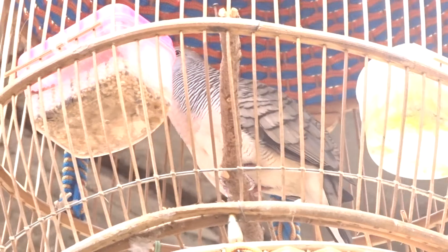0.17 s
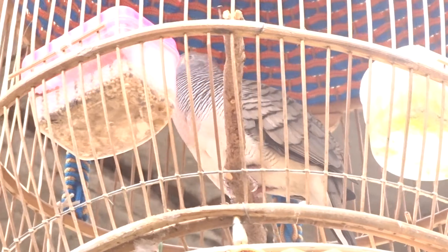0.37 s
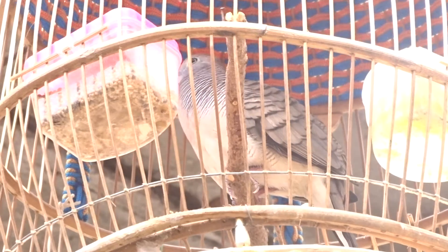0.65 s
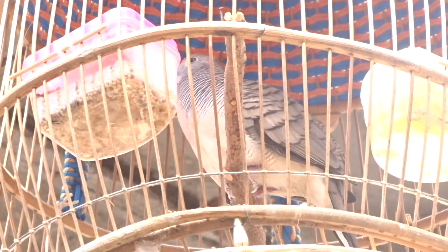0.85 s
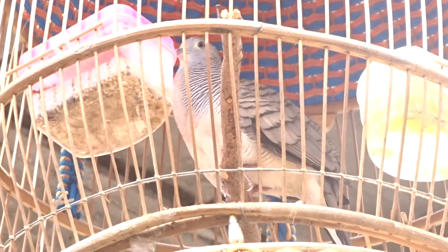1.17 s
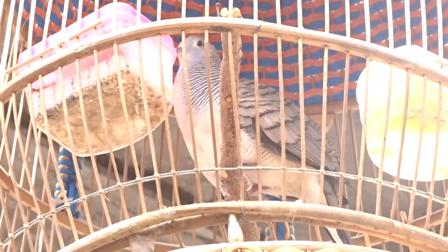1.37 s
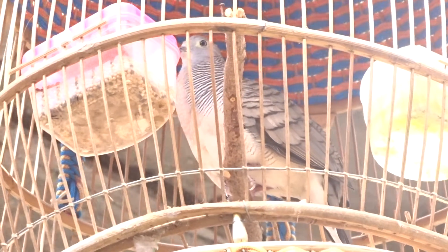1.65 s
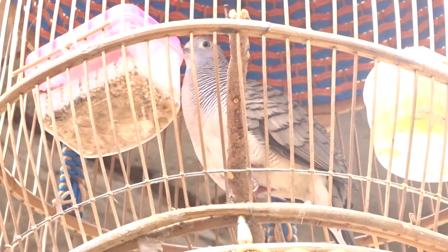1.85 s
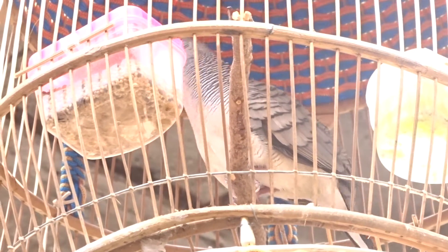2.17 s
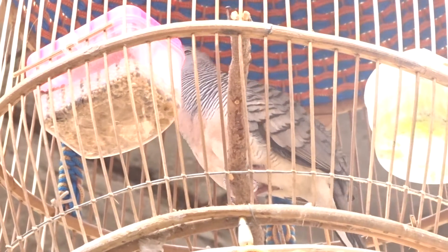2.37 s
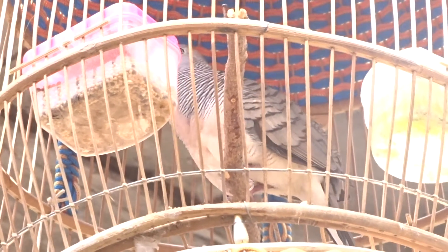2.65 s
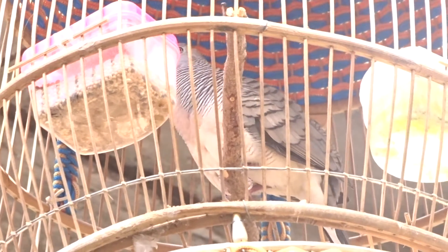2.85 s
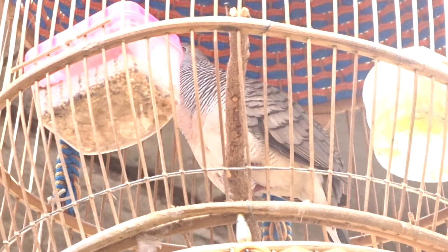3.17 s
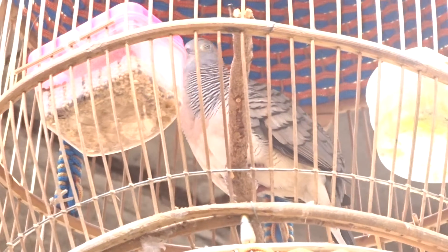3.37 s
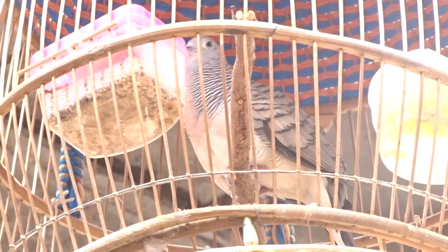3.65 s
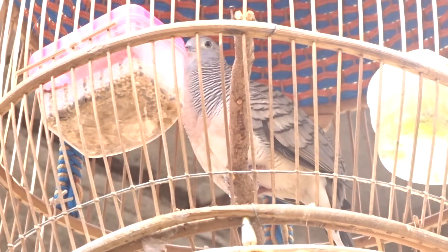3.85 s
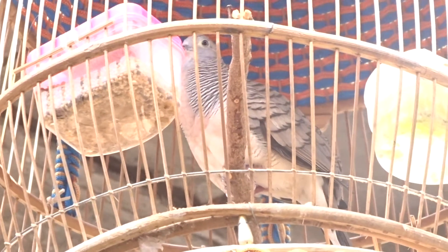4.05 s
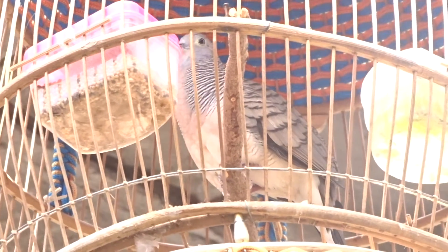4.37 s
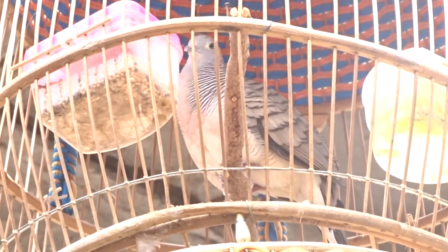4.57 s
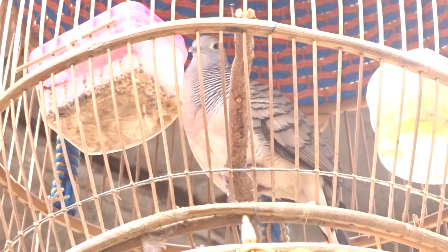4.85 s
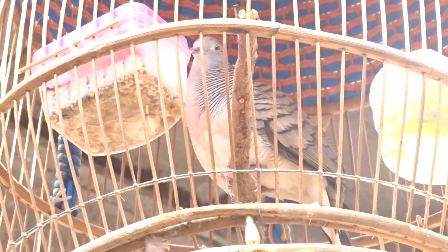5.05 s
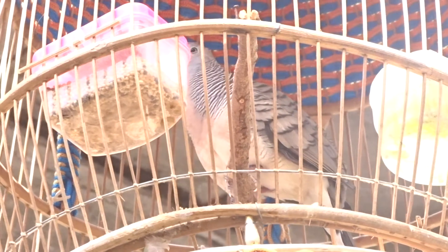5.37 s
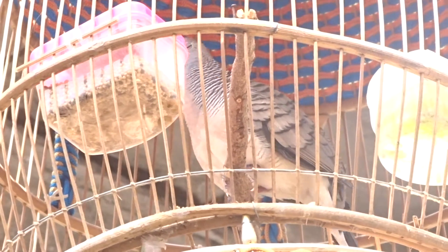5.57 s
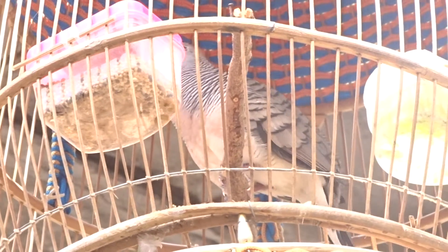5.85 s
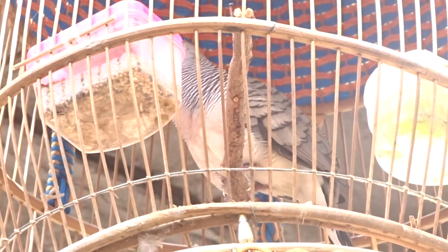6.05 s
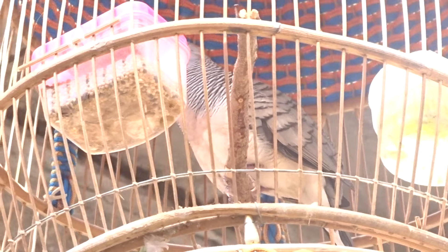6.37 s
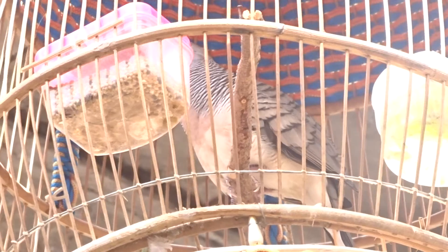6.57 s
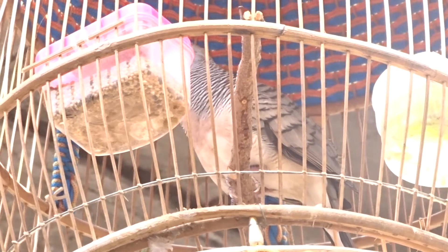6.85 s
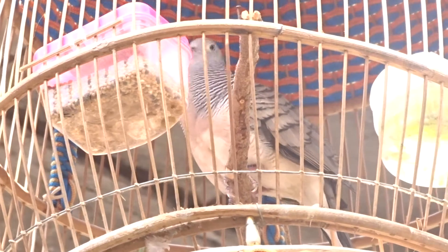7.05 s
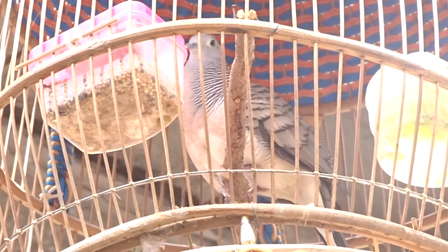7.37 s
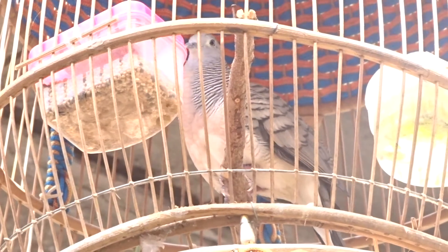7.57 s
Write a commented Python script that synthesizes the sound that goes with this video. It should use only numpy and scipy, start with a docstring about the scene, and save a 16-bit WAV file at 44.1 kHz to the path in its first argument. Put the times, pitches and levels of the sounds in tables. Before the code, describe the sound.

Near-pure, hollow coos scoop upward and sag in rapid strings of very short notes, at the start, after two seconds and near six. Other doves reply more faintly. Between them come brief falling, raspy sparrow chirps, a breathy swish before four seconds and a sharp tick near the end. Short porch echoes surround everything over a faint distant street hush; the stereo pickup is fairly close.

```python
"""Zebra doves under a porch

Zebra doves coo in quick trilled phrases from cages under a reverberant porch: near-pure tones scoop up,
hold and sag, and after a pause a slower, steadier note opens the phrase. Sparrows chirp and whistle
among them as fluttering tones, often on two voices at once. Swishes, soft bumps and ticks are short
shaped noise; faint far hoots are plain wavering tones. Coloured noise and a hum make the outdoor hush."""
import sys
import numpy as np
from scipy import signal
from scipy.fft import rfft, irfft, next_fast_len
from scipy.io import wavfile
from scipy.ndimage import map_coordinates

SR = 44100
rng = np.random.default_rng(int(sys.argv[2]) if len(sys.argv) > 2 else 0)


def master_out(mix):
    """Clip the mix to full scale and print it as 16-bit PCM to the path in sys.argv[1]."""
    frames = np.transpose(np.atleast_2d(mix))
    ceiling = np.clip(frames, -1, 1)
    pcm = np.round(ceiling * 32767).astype(np.int16)
    wavfile.write(sys.argv[1], SR, pcm)


N = 339983  # samples

# far street noise and treble hiss together: pitch_hz, density_db (per Hz, relative)
HUSH_SPECTRUM = [(20, -46), (40, -13), (60, -11.5), (100, -9), (180, -3.5), (330, -4), (600, -3.5),
                 (1000, -4), (1600, -10), (3500, -8), (6000, -7.5), (8000, -2), (10000, -5), (11000, -11)]
# slow swell of the far street's rumble, before STREET_GAIN_DB: time_s, level_db
STREET_SWELL = [(0.0, -60), (3.63, -59), (3.71, -58), (5.78, -64), (6.4, -57), (6.91, -60.5), (7.17, -61),
                (7.71, -62.5)]
# slow swell of the treble hiss, before HISS_GAIN_DB: time_s, level_db
HISS_SWELL = [(0.0, -66), (0.73, -62), (1.24, -72.5), (2.94, -67), (3.35, -68), (3.8, -63), (5.17, -68),
              (6.74, -62), (6.96, -69.5), (7.71, -61.5)]
STREET_GAIN_DB = 3  # the whole street noise over its rumble
HISS_GAIN_DB = 0.36  # the whole hiss over its treble

# notes of the near dove: start_s, length_s, top_hz, level_db (before fades and accents)
NEAR_COOS = [(-.03, 0.044, 1171, -30.5), (.03, 0.039, 1276, -30.5), (.114, 0.0343, 1295, -27.5),
             (.23, .058, 1288, -30.5), (.397, 0.099, 1301, -31), (.582, 0.056, 1192, -38.5),
             (2.374, 0.11, 1222, -26.5), (2.505, 0.048, 1165, -25), (2.58, .04, 1140, -21.5),
             (2.675, .105, 1160, -27.5), (2.808, 0.073, 1276, -30.5), (2.885, .036, 1350, -33.5),
             (2.965, 0.038, 1296, -31.5), (3.053, 0.033, 1296, -32), (3.174, 0.046, 1294, -31),
             (3.345, .1, 1308, -32), (5.821, 0.13, 1221, -26.5), (5.966, 0.043, 1164, -26),
             (6.041, 0.041, 1150, -22), (6.144, .15, 1168, -28.3), (6.302, 0.034, 1300, -29.5),
             (6.448, 0.097, 1304, -31)]
# notes of doves in cages farther off: start_s, length_s, top_hz, level_db (before fades and accents)
FAR_COOS_HEARD = [(.14, 0.095, 972, -41), (.3, .12, 1180, -38.5), (.75, 0.075, 1283, -30),
                  (.832, 0.075, 1231, -30.5), (1.008, 0.064, 1214, -33), (1.125, 0.089, 1254, -32),
                  (1.266, .13, 1265, -32.5), (1.49, 0.11, 1267, -32), (4.005, 0.264, 1234, -38.5),
                  (4.322, 0.055, 1123, -35.5), (4.432, 0.044, 1170, -35.5), (4.563, .13, 1192, -38.5),
                  (5.13, 0.22, 1014, -49), (5.34, 0.26, 871, -54), (5.675, 0.12, 961, -46.5),
                  (6.02, 0.055, 1327, -28), (6.08, 0.12, 1313, -37)]
# a coo's weak overtones, before each dove's trim: multiple_of_pitch, level_db (against the fundamental)
COO_OVERTONES = [(2, -33), (3, -34.5), (4, -40), (5, -37.5), (6, -31.5), (7, -40.5), (8, -45.5), (9, -42.5)]
# drawn-out first note of a phrase: scoop_s, sag_per_s, low_register_accent_db, scoop_jitter (share of pitch)
OPENING_NOTE = (.027, 0.692, 3.3, 0.0044)
# change per dB of force: start_hz, scoop_s, low_register_accent_db, overtones_db
FORCE_PER_DB = (15.5, .0006, 0.64, -0.73)
PAUSE_S = .5  # a longer gap between note starts opens a new phrase
REST_HZ = 792  # the pitch sags toward this as the air runs out
SCOOP_JITTER = 0.032  # raggedness of a quick note's pitch until it arrives, as a share of the pitch

# resonances of the corner where the cage hangs: centre_hz, width_hz, level_db
NOOK_RESONANCES = [(1024, 21, -9), (1197, 34, -3)]
# echoes off the near walls, before the echo trim: delay_s, strength (gain), side (-1..1)
WALL_ECHOES = [(.0043, 0.046, 0.42), (0.014, 0.28, -0.58), (0.0222, 0.1, .3), (0.026, 0.16, -.3),
               (0.04, .09, .2)]
# time for the porch's diffuse tail to drop 60 dB: pitch_hz, t60_s
PORCH_DECAY = [(200, 1), (1100, 0.5), (3500, 0.46), (10000, 0.46)]

# two-part sparrow chirps: start_s, fall_length_s, fall_level_db, closing_level_db
SPARROW_CHIRPS = [(0.031, 0.16, -55.5, -74), (0.75, .12, -42.5, -68), (1.814, 0.076, -36, -39.5),
                  (2.638, 0.083, -38, -42), (4.036, 0.11, -42.5, -40.5), (4.758, 0.13, -44.5, -44),
                  (5.443, .056, -42.5, -51)]
# both sides of the syrinx in a falling syllable, levels against the syllable's:
# time_s (into the chirp), upper_hz, upper_db, lower_hz, lower_db
CHIRP_FALL = [(0, 6480, 2, 2260, -16), (.01, 4600, -8.5, 2900, -11), (0.017, 4180, -1, 3330, -7.5),
              (0.033, 3970, -3, 3290, 0.5), (.047, 3610, -7.5, 2758, 1), (.062, 3500, -12, 2496, 4.5),
              (.088, 3400, -48, 2470, -8.5)]
# other small-bird calls: start_s, length_s, start_hz, end_hz, level_db, roughness (share of pitch)
SMALL_BIRD_CALLS = [(2.081, 0.082, 5760, 5420, -51, 0.072), (2.074, 0.08, 8970, 8900, -55.5, 0.12),
                    (2.249, 0.2, 2336, 2523, -62, 0.013), (2.331, 0.2, 5030, 4940, -66, 0.011),
                    (5.444, 0.037, 5870, 5170, -46, 0.076), (5.45, 0.076, 2900, 3100, -49, 0.019),
                    (5.663, .15, 6840, 5390, -56, 0.079), (5.905, 0.15, 4078, 4230, -53, 0.0013),
                    (6.073, 0.24, 2810, 2190, -56.5, 0.145)]

# soft swishes: start_s, level_db, rise_s
SWISH_EVENTS = [(2.89, -46, 0.011), (3.694, -30.5, 0.045), (7.352, -45, .02)]
# swish colour: pitch_hz, density_db (per Hz, relative)
SWISH_SPECTRUM = [(60, -25), (150, -12), (300, -18.5), (600, -11.5), (850, -6.5), (1250, -6), (2200, -10.5),
                  (3000, -9.5), (4500, -11), (6300, -14.5), (9000, -8.5), (10200, -12), (11000, -21.5)]
# soft bumps: start_s, level_db, rise_s
BUMP_EVENTS = [(1.475, -53.5, 0.018), (1.58, -56, 0.06), (5.2, -56.5, 0.058), (6.752, -47, 0.017),
               (6.81, -47.5, 0.0101), (7.37, -50, 0.02)]
# bump colour: pitch_hz, density_db (per Hz, relative)
BUMP_SPECTRUM = [(100, -19), (250, -14), (380, -3.5), (550, -6.5), (800, -15), (1600, -21.5), (4000, -23.5),
                 (11000, -32)]
# ticks: start_s, level_db, rise_s
TICK_EVENTS = [(.367, -38, 0.00061), (1.01, -49.5, .002), (2.238, -51, 0.002), (2.364, -57, 0.0013),
               (6.548, -44.5, 0.0042), (7.372, -34.5, 0.0023)]
# tick colour: pitch_hz, density_db (per Hz, relative)
TICK_SPECTRUM = [(500, -5), (1800, 4), (4000, -22), (8000, -2), (10500, 2.5)]

# faint far hoots, before the porch: start_s, length_s, pitch_hz, level_db
FAR_HOOTS = [(2.052, 0.424, 393, -64), (2.679, 0.078, 319.5, -57.5), (3.549, 0.12, 599, -55),
             (3.963, 0.11, 340, -55.5), (4.091, 0.17, 728, -50), (4.233, 0.054, 341, -49.5),
             (4.335, 0.086, 364.5, -52.5), (6.232, 0.42, 346.2, -63.5), (6.939, 0.054, 640, -52.5),
             (7.407, 0.14, 285, -58.5), (7.534, 0.11, 553, -55)]

# phase lead of the left microphone port over the right: pitch_hz, lead_rad
LEFT_PORT_LEAD = [(0, 0.1), (780, 0.75), (7670, 0.18), (10100, 0.66), (10700, 0.99)]
TOP_HZ = 11100  # upper band limit


def amp(db):
    """Decibels to gain."""
    return 10 ** (np.asarray(db) / 20)


def unit(x):
    """Scale to rms 1."""
    return x / np.sqrt(np.mean(x ** 2) + 1e-20)


def along(points, hz):
    """Read a curve of (Hz, value) points on a log frequency axis."""
    f, v = np.transpose(points)
    return np.interp(np.log(hz + 1), np.log(f + 1), v)


def clock(length_s):
    """Sample times of a stretch of sound."""
    return np.arange(int(max(length_s, .01) * SR)) / SR


def wobble(t, rate):
    """A smooth random curve, rate knots a second."""
    return map_coordinates(rng.standard_normal(4096), [t * rate], mode="wrap")


def filtered(x, response):
    """Shape x by a response given as a function of frequency."""
    n = x.shape[-1]
    padded = next_fast_len(n + 8192)
    spectrum = rfft(x, padded) * response(np.fft.rfftfreq(padded, 1 / SR))
    return irfft(spectrum, padded)[..., :n]


def add(track, start_s, sound):
    """Mix a sound into a track, trimming what falls outside it."""
    start = round(start_s * SR)
    sound = sound[..., max(-start, 0):N - start]
    first = max(start, 0)
    track[..., first:first + sound.shape[-1]] += sound


def spread(pair, side_db):
    """Two unrelated signals as the middle and the sides of a stereo image."""
    middle, side = pair
    return middle + amp(side_db) * np.array([side, -side])


def noise(spectrum, n, side_db):
    """Coloured stereo noise of rms 1."""
    pair = filtered(rng.standard_normal((2, n)), lambda hz: amp(along(spectrum, hz)))
    return unit(spread(pair, side_db))


def gate(t, rise_s, fall_s):
    """A note's smooth opening and closing."""
    opening = np.sin(np.pi / 2 * np.clip(t / rise_s, 0, 1)) ** 2
    closing = np.sin(np.pi / 2 * np.clip((t[-1] - t) / fall_s, 0, 1)) ** 2
    return opening * closing


def tone(hz, overtones=()):
    """A sine of rms 1 on a pitch track, with weak overtones on top."""
    phase = 2 * np.pi * np.cumsum(hz) / SR
    upper = sum(amp(db) * np.sin(round(k) * phase) for k, db in overtones)
    return np.sqrt(2) * (np.sin(phase) + upper)


def hush():
    """Far street noise, a thin high hiss and a faint mains hum."""
    t = np.arange(N) / SR
    air = noise(HUSH_SPECTRUM, N, side_db=-8)

    def low_share(hz):
        """Gentle split of the air into street and hiss around 2500 Hz."""
        return 1 / (1 + (hz / 2500) ** 2)

    street_db = STREET_GAIN_DB + np.interp(t, *np.transpose(STREET_SWELL)) + 1.247 * wobble(t, 7)
    street = unit(filtered(air, low_share)) * amp(street_db)
    hiss_db = np.interp(t, *np.transpose(HISS_SWELL)) + HISS_GAIN_DB + 0.45 * wobble(t, 13)
    hiss = unit(filtered(air, lambda hz: 1 - low_share(hz))) * amp(hiss_db)
    hum = amp(-74.5) * tone(100 + 0.36 * wobble(t, 2.7))
    return street + hiss + hum


def doves(notes, start_hz, scoop_s, sag_per_s, overtone_db, rise_s, fall_s, fade_db, flutter, low_db, break_db):
    """Each coo starts in a low register, breaks upward as pressure builds, then sags as the air runs out."""
    out = np.zeros(N)
    starts, _, _, levels = np.transpose(notes)
    gaps = np.diff(starts, prepend=starts[0])
    for (start_s, length_s, top_hz, note_db), gap in zip(notes, gaps):
        t = clock(length_s)
        progress = t / t[-1]
        # forceful notes start higher, lean on the low register and are purer; soft ones slip through it
        force_db = np.clip(note_db - levels.mean(), -4, 4)
        lift_hz, linger_s, accent_db, colour_db = np.multiply(FORCE_PER_DB, force_db)
        if gap > PAUSE_S:
            scoop, sag, opening_db, jitter = OPENING_NOTE
        else:
            scoop, sag, opening_db, jitter = scoop_s + linger_s, sag_per_s, 0, SCOOP_JITTER
        low = np.exp(-(t / scoop) ** 4.17)  # share of the low register
        low_hz = min(start_hz + lift_hz, .86 * top_hz) * (1 + 2.4 * t)
        sag_hz = (top_hz - REST_HZ) * sag * length_s * progress ** 2.484
        approach = 1 - 0.117 * np.exp(-t / 0.01587)  # the high register eases up to its pitch
        high_hz = (top_hz - sag_hz) * approach
        unsteady = 1 + flutter * wobble(t, 157.4) + jitter * low * wobble(t, 405)
        hz = (low * low_hz + (1 - low) * high_hz) * unsteady
        # overtones appear once the pitch has arrived
        trim_db = overtone_db + colour_db
        overtones = [(k, db + trim_db + 2 * rng.normal() - 20 * low) for k, db in COO_OVERTONES]
        voice = tone(hz, overtones)
        # the voice weakens during the break between registers
        level = note_db + fade_db * progress + (low_db + accent_db + opening_db) * low
        level = level + break_db * np.sin(np.pi * low)
        level = level + 1.35 * wobble(t, 95.8) + 0.45 * wobble(t, 796.4)
        add(out, start_s, voice * gate(t, rise_s, fall_s) * amp(level))
    return out


def nook(x):
    """The scoops sweep through the corner's resonances and leave them ringing."""
    def response(hz):
        """Direct sound plus one band-pass ring per resonance."""
        return 1 + sum(amp(db) * 1j * hz * width / (centre * centre - hz * hz + 1j * hz * width)
                       for centre, width, db in NOOK_RESONANCES)
    return filtered(x, response)


def porch(x, tail_db, echo_db):
    """Direct sound, echoes off the near walls and a diffuse tail whose decay depends on frequency."""
    hz, t, bins = signal.stft(rng.standard_normal((2, int(.7 * SR))), SR, nperseg=256)
    decay = amp(-60 * t / along(PORCH_DECAY, hz)[:, None])
    tail = signal.istft(bins * decay, SR, nperseg=256)[1]
    build_up = np.minimum(np.arange(tail.shape[1]) / SR / .012, 1)  # over 12 ms
    tail = spread(tail * build_up, side_db=-12)
    response = amp(tail_db) * tail / np.linalg.norm(tail[0])
    response[:, 0] += 1  # direct sound
    for delay_s, strength, side in WALL_ECHOES:
        response[:, round(delay_s * SR)] += strength * amp(echo_db) * np.array([1 + side, 1 - side])
    response = response / np.linalg.norm(response[0])
    return signal.fftconvolve(x[None], response, axes=1)[:, :N]


def rasp(hz, t, rough):
    """A small bird's whistle, roughened by fast flutter of pitch and strength."""
    whistle = tone(hz * (1 + rough * wobble(t, 1500)), [(2, -16.0)])
    return whistle * amp(34.0 * rough * wobble(t, 500))


def sparrows():
    """A chirp is a harsh steep fall sung by both sides of the syrinx, then a short closing syllable."""
    out = np.zeros(N)
    times, *shape = np.transpose(CHIRP_FALL)
    for start_s, length_s, fall_db, close_db in SPARROW_CHIRPS:
        t = clock(length_s)
        upper_hz, upper_db, lower_hz, lower_db = [np.interp(t, times, column) for column in shape]
        harsh = .034 + .14 * amp(-480 * t)  # roughest at the onset
        voices = 0
        for hz, db in [(upper_hz, upper_db), (lower_hz, lower_db)]:
            wavering_hz = hz * (1 + 0.0352 * wobble(t, 131.9))
            voices = voices + amp(db) * rasp(wavering_hz, t, harsh)
        add(out, start_s, amp(fall_db) * voices * gate(t, 0.0055, 0.022))
        t = clock(0.08)
        closing_hz = 3900 - 7000 * t + 200 * wobble(t, 196.1)
        closing = rasp(closing_hz, t, rough=0.054) * gate(t, 0.016, 0.069)
        add(out, start_s + 0.1, amp(close_db) * closing)
    for start_s, length_s, start_hz, end_hz, db, rough in SMALL_BIRD_CALLS:
        t = clock(length_s)
        call = rasp(np.linspace(start_hz, end_hz, len(t)), t, rough)
        add(out, start_s, amp(db) * call * gate(t, 0.017, 0.014))
    return out


def bursts(events, spectrum, t60_s):
    """Noisy strokes that swell and die away: a linear rise, then an exponential decay."""
    out, t = np.zeros((2, N)), clock(0.95)
    for start_s, db, rise_s in events:
        decay_db = -60 * np.maximum(t - rise_s, 0) / t60_s
        shape = np.minimum(t / rise_s, 1) * amp(db + decay_db)
        add(out, start_s, shape * noise(spectrum, len(t), side_db=-12))
    return out


def hoots():
    """Soft, slightly wavering low tones from far away."""
    out = np.zeros(N)
    for start_s, length_s, hz, db in FAR_HOOTS:
        t = clock(length_s)
        add(out, start_s, amp(db) * tone(hz + 5 * wobble(t, 50)) * gate(t, 0.013, 0.011))
    return out


def scene():
    """The near dove and farther birds in one porch, with small noises, over the hush."""
    near = nook(doves(NEAR_COOS, start_hz=880.7, scoop_s=.018, sag_per_s=2.7, overtone_db=4.0,
                      rise_s=0.016, fall_s=0.0071, fade_db=-1.5, flutter=0.0063, low_db=3.5, break_db=-3))
    far = doves(FAR_COOS_HEARD, start_hz=950, scoop_s=0.01643, sag_per_s=1.57, overtone_db=-8.5,
                rise_s=0.018, fall_s=0.013, fade_db=-4.0, flutter=0.017, low_db=2, break_db=-2.0)
    # left and right trims in dB place each voice in the stereo image
    birds = porch(near, tail_db=-1.5, echo_db=2.0) * amp([[-.5], [-1.1]])
    birds = birds + porch(far, tail_db=2, echo_db=-2.0) * amp([[-.6], [1.1]])
    birds = birds + porch(sparrows(), tail_db=1.0, echo_db=2.0) * amp([[-.6], [.6]])
    birds = birds + porch(hoots(), tail_db=-7.5, echo_db=-19)
    swishes = bursts(SWISH_EVENTS, SWISH_SPECTRUM, t60_s=0.58)
    bumps = bursts(BUMP_EVENTS, BUMP_SPECTRUM, t60_s=1.0)
    ticks = bursts(TICK_EVENTS, TICK_SPECTRUM, t60_s=0.14)
    return birds + swishes + bumps + ticks + hush()


def record(dry):
    """Sound reaches the left microphone port a little early; nothing passes above the band limit."""
    def port_phase(hz):
        """Half the lead forward on the left, half back on the right."""
        lead_rad = np.interp(hz, *np.transpose(LEFT_PORT_LEAD))
        return np.exp(.5j * lead_rad * np.array([[1], [-1]]))
    ports = filtered(dry, port_phase)
    return filtered(ports, lambda hz: hz < TOP_HZ)


dry = scene()
out = record(dry)
master_out(out)
```